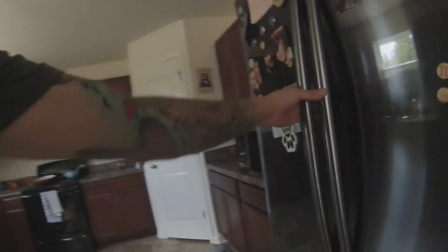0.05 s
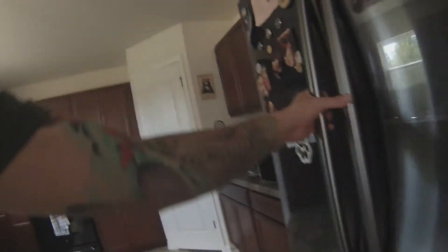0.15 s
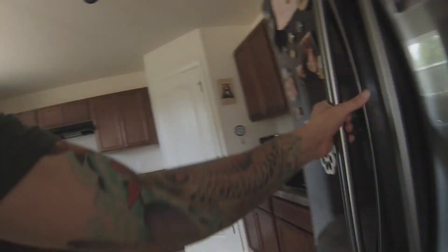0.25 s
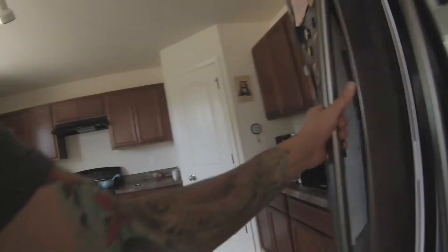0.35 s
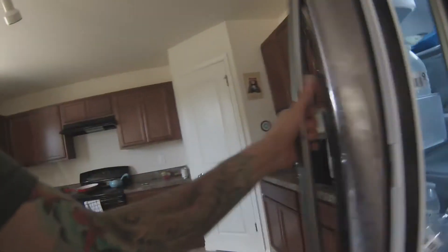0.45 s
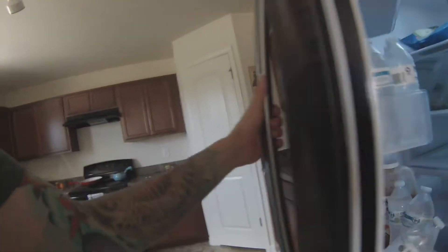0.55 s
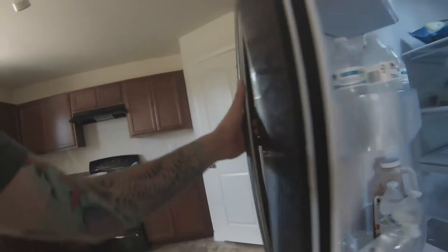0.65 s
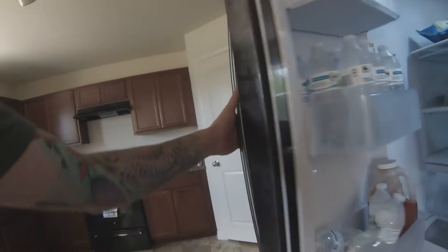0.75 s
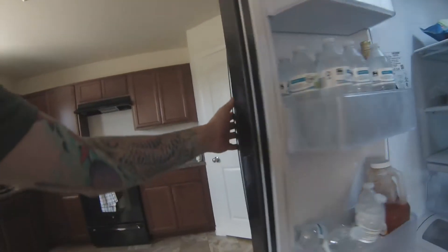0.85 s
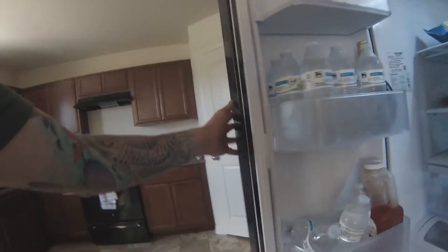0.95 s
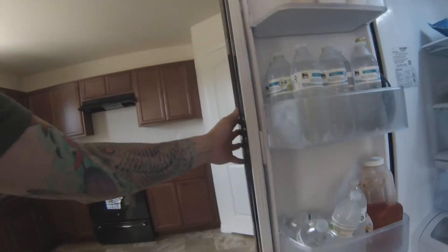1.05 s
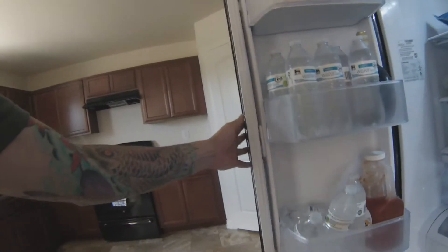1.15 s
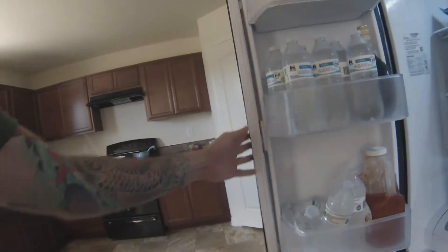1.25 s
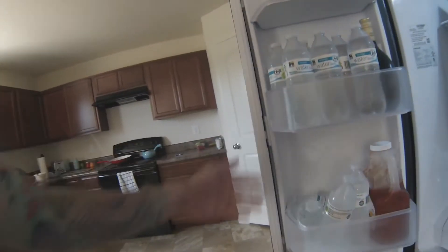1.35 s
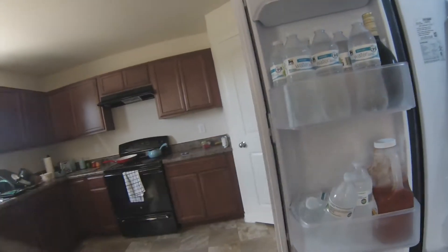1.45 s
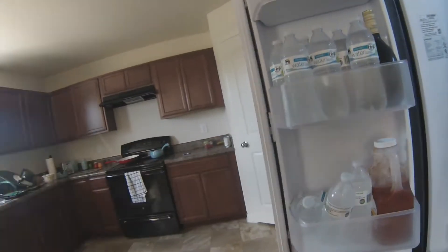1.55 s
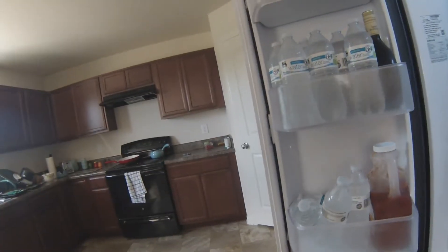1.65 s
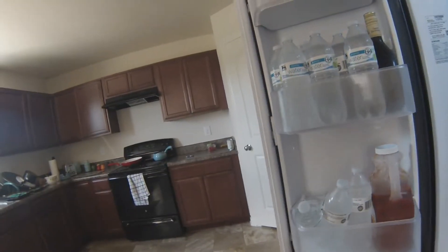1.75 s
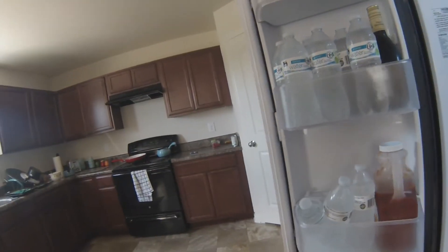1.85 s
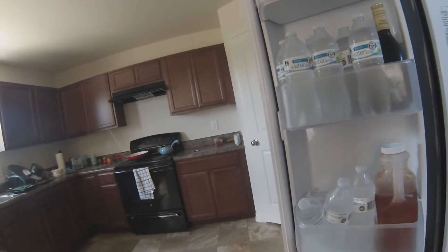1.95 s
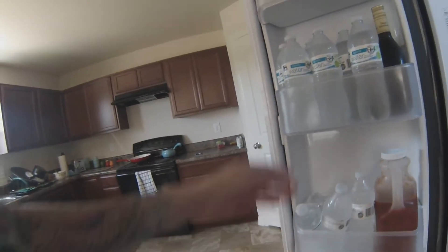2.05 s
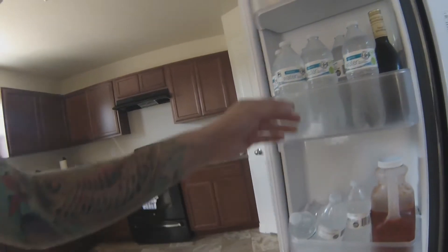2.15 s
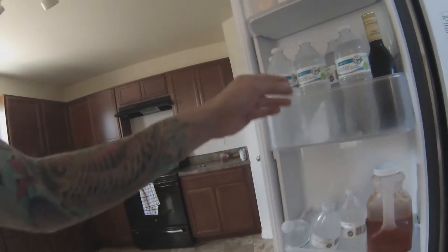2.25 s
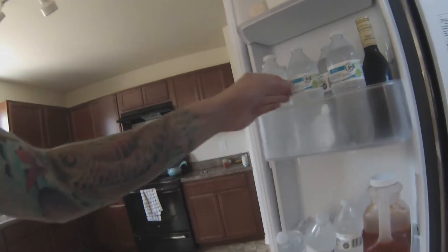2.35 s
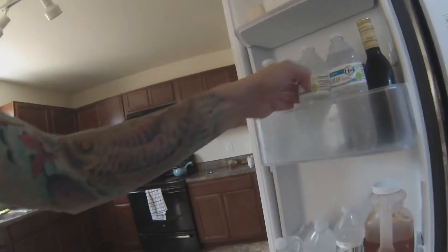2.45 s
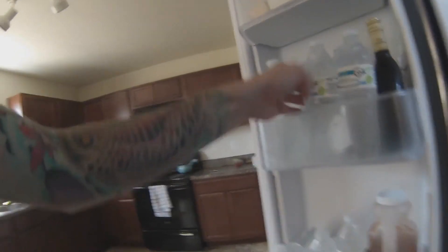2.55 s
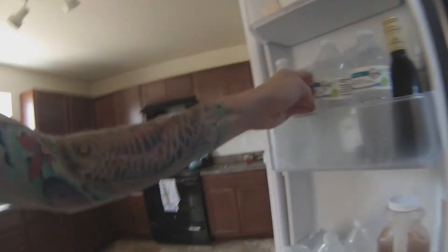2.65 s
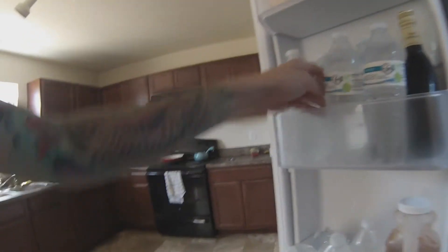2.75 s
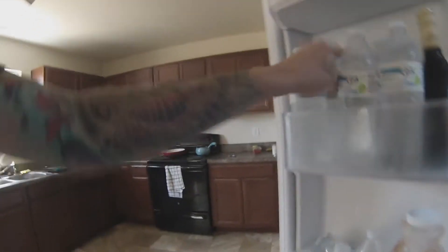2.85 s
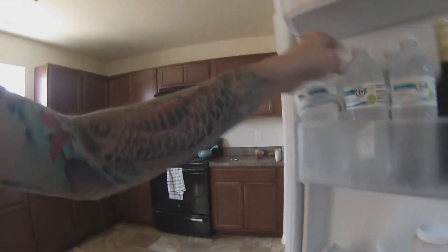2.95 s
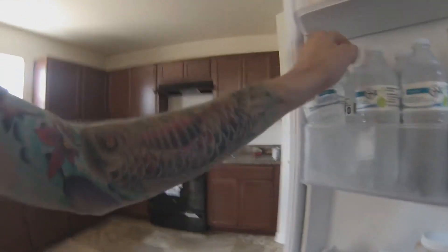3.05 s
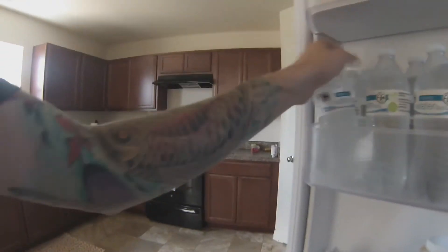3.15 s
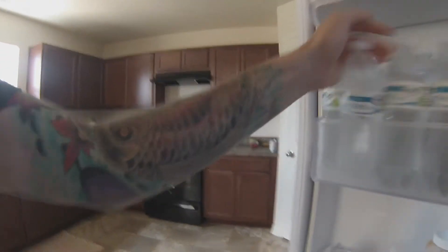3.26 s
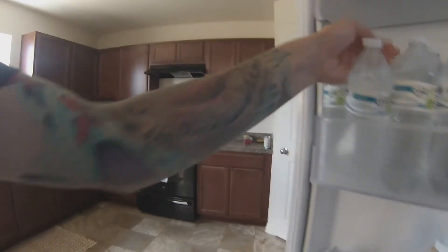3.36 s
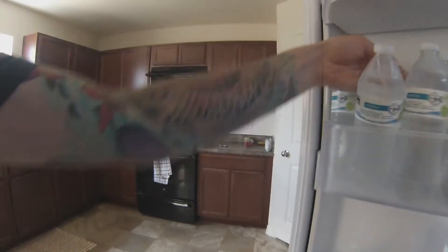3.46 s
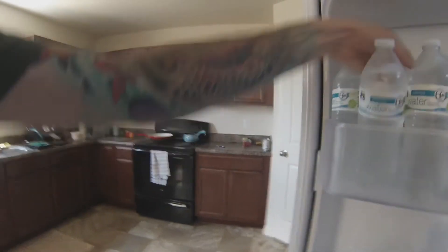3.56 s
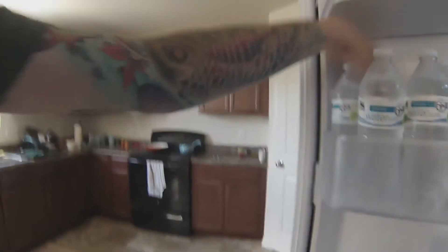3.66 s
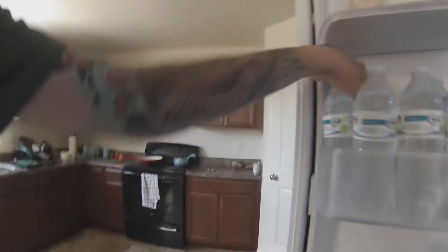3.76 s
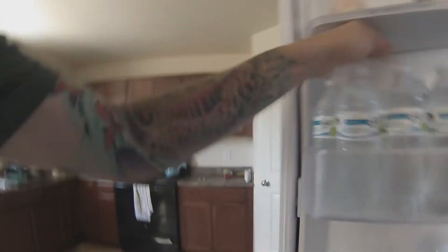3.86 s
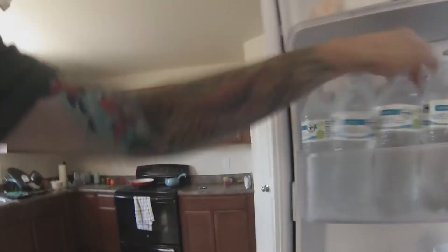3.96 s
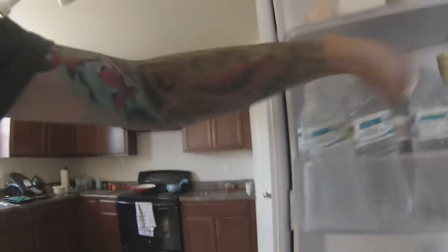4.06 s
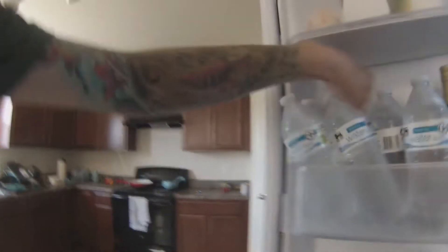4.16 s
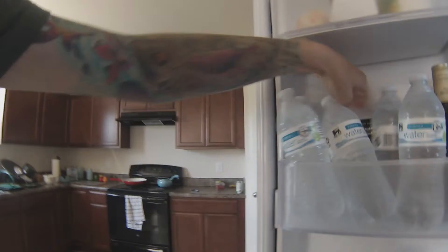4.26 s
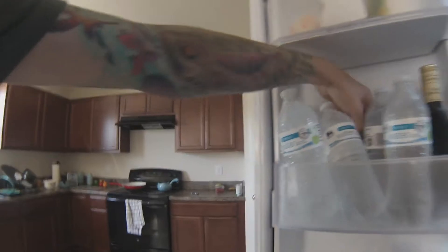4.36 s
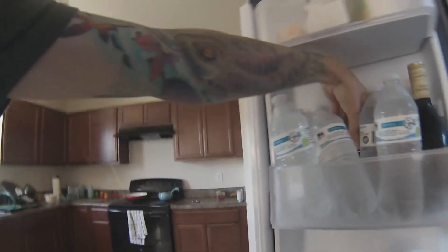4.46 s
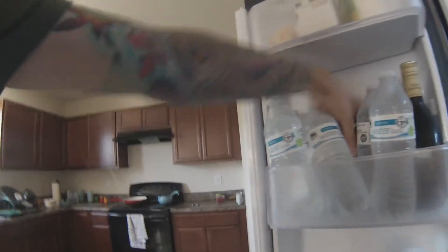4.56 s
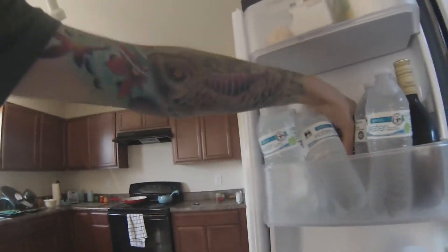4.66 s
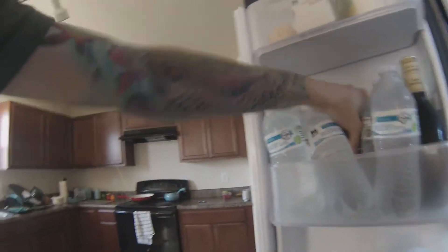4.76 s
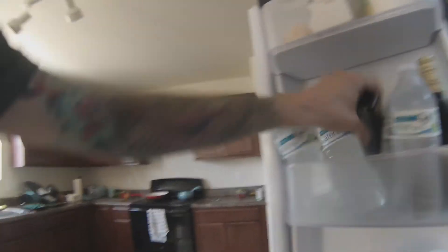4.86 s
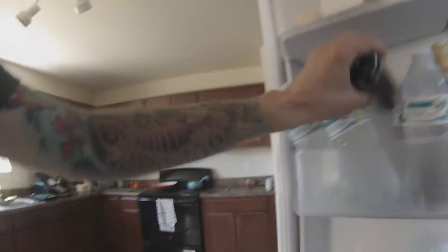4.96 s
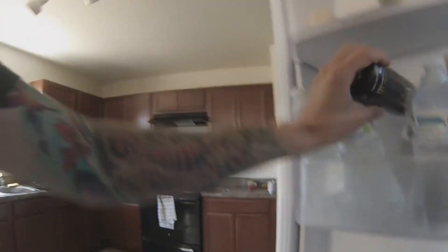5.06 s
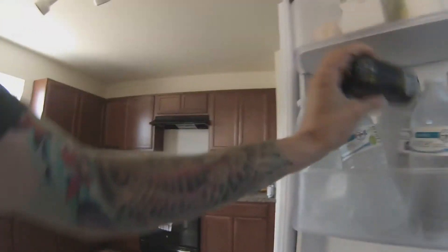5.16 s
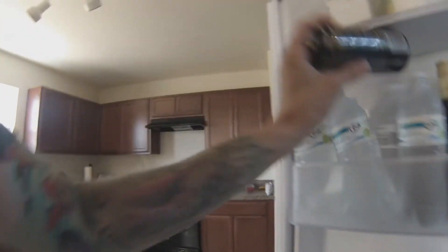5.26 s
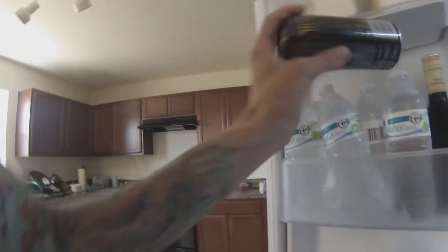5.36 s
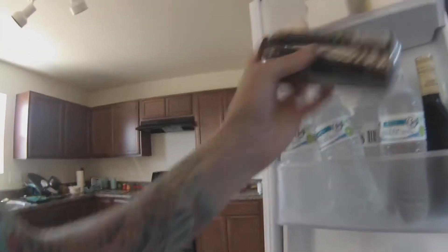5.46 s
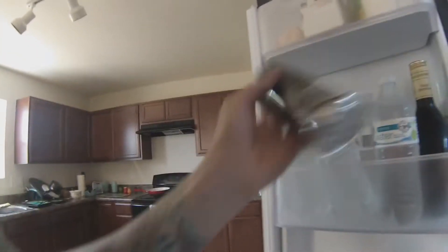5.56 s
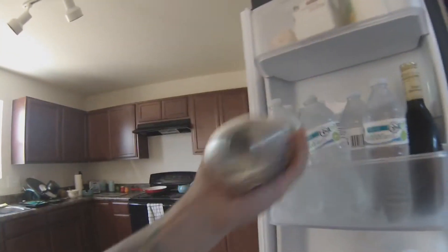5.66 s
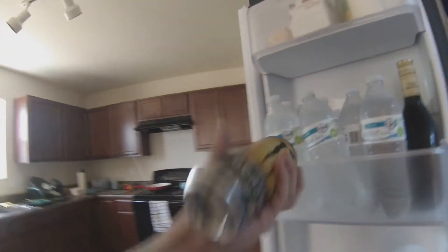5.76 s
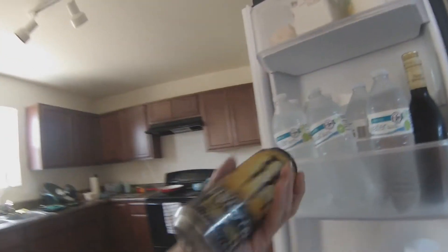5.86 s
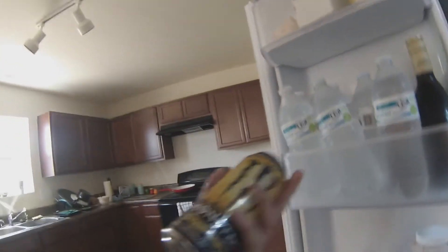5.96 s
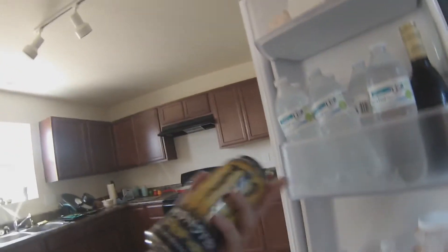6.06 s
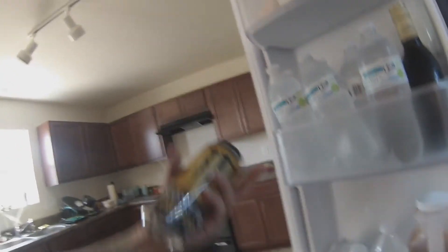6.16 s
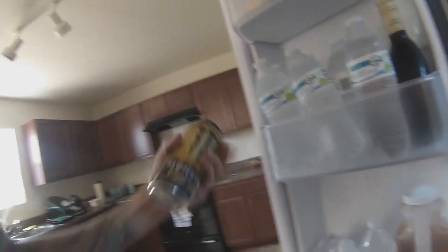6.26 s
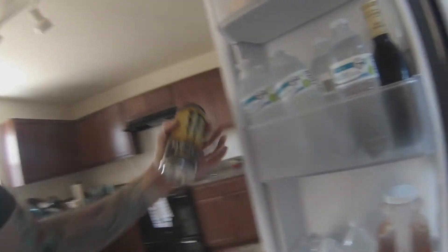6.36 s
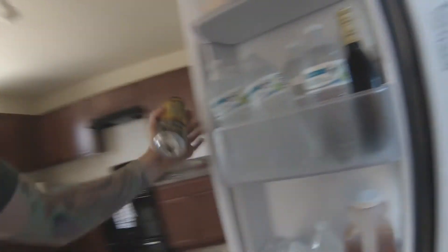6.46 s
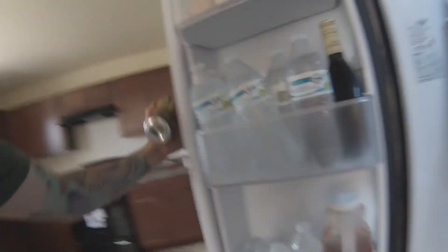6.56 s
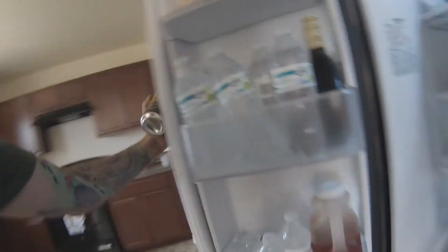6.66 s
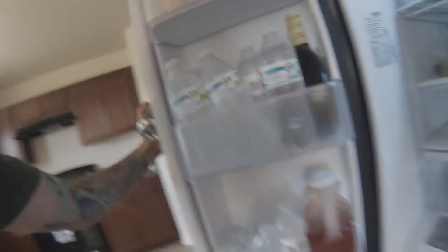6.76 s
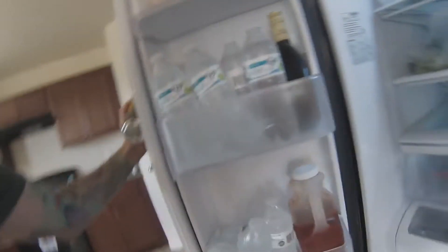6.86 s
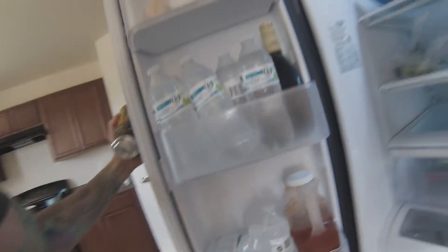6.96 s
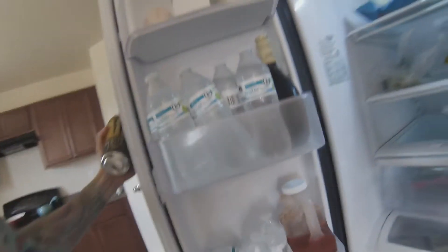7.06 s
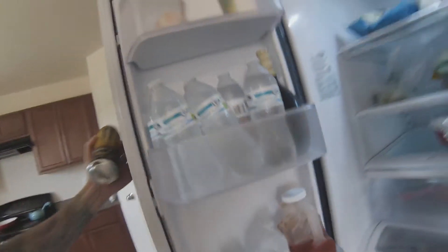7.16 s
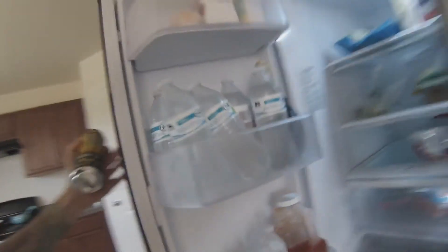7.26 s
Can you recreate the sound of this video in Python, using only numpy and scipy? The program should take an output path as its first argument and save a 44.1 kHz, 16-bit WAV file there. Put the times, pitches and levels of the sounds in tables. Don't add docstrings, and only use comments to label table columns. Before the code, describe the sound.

A fridge door opens softly, then a hand shoves thin plastic water bottles aside with clattering knocks and sharp crinkling snaps, over a low fan hum.

```python
import sys
import numpy as np
from scipy import signal
from scipy.fft import rfft, irfft
from scipy.io import wavfile
from scipy.ndimage import uniform_filter1d

SR = 44100
rng = np.random.default_rng(int(sys.argv[2]) if len(sys.argv) > 2 else 0)


def store_wav(level_fs):
    pcm = np.round(np.clip(np.atleast_2d(level_fs), -1, 1) * 32767)
    wavfile.write(sys.argv[1], SR, pcm.T.astype(np.int16))


def voltage_ratio(decibels):
    exponent = np.asarray(decibels, float) / 20
    return 10 ** exponent


N = 321644


def unit(x):
    return x / np.sqrt(np.mean(x ** 2))


def colour(x, points):
    hz, db = np.transpose(points)
    f = np.maximum(np.fft.rfftfreq(len(x), 1 / SR), 1)
    return irfft(rfft(x) * voltage_ratio(np.interp(np.log(f), np.log(hz), db)), len(x))


def band_limit(x, order, hz, kind):
    return signal.sosfilt(signal.butter(order, hz, kind, fs=SR, output="sos"), x)


def resonate(x, peaks):
    return sum(voltage_ratio(db) * signal.lfilter(*signal.iirpeak(hz, hz / width, fs=SR), x)
               for hz, width, db in peaks)


def level_curve(spans):
    t, level = np.arange(N) / SR, np.full(N, -110.0)
    for rows in map(np.array, spans):
        inside = (t >= rows[0, 0]) & (t <= rows[-1, 0])
        level[inside] = np.interp(t[inside], rows[:, 0], rows[:, 1])
    return uniform_filter1d(level, size=441)


def walk(rate):
    k = int(SR / rate)
    held = np.repeat(rng.standard_normal(N // k + 1), k)
    return unit(uniform_filter1d(held, k)[:N])


def grains(per_s, spread_db):
    clicks = (rng.random(N) < per_s / SR) * rng.standard_normal(N)
    return unit(clicks * voltage_ratio(spread_db * np.minimum(rng.exponential(size=N), 2)))


def ring(hz, db, t60, chatter, contact_ms, rise_ms):
    t = np.arange(int(SR * np.clip(np.max(t60), .005, .4))) / SR
    decay = np.exp(-np.log(1000) * np.outer(1 / t60, t))
    modes = voltage_ratio(db) @ (np.sin(2 * np.pi * np.outer(hz, t)) * decay)
    ms = np.arange(1, len(chatter) + 1) * 1000 / SR
    push = chatter * np.exp(-ms / max(contact_ms, .05)) * (1 - np.exp(-ms / max(rise_ms, .02)))
    out = signal.fftconvolve(modes, push)
    return out / np.abs(out).max()


def add(out, s, x):
    i = int(max(s, 0) * SR)
    out[i:i + len(x)] += x[:N - i]


def away_from(s, times):
    return np.min(np.abs(s - np.array(times))) * 200 > 1


# (frequency [Hz], level [dB per Hz])
KITCHEN_NOISE = [(20, -2.5), (54, -1), (103, -11), (230, -14.5), (398, -11), (507, -14), (1700, -18),
                 (16000, -41.5)]
# (time [s], level [dB])
FAN_TURNS = [(0, 3.5), (0.45, 2), (1.2, 1.5), (2.4, 1), (5.8, 0), (6.6, 0), (7.29, 2)]
# (frequency [Hz], level [dB])
MAINS_HUM = [(59.2, -84)]


def kitchen():
    t = np.arange(N) / SR
    air = unit(colour(rng.standard_normal(N), KITCHEN_NOISE))
    air = air * voltage_ratio(-56 + np.interp(t, *np.transpose(FAN_TURNS)) + 0.22 * walk(3.54))
    hum = sum(voltage_ratio(db + 1 + 3.3 * walk(8.2)) * np.sin(2 * np.pi * hz * t) for hz, db in MAINS_HUM)
    return air + hum


# (frequency [Hz], decay time t60 [s], level [dB])
KITCHEN_ECHO = [(102, 1, 1), (200, 0.34, 2.5), (450, 0.5, 1), (1220, 0.57, -2), (5500, 0.24, -1),
                (12900, 0.26, 1.5)]


def echo(x):
    echo_db, gap_s = -6.5, 0.014
    t, tail = np.arange(SR) / SR, 0
    hz, t60s, levels = np.transpose(KITCHEN_ECHO)
    for f in 45 * 2 ** np.arange(9):
        t60 = np.interp(np.log(f), np.log(hz), t60s)
        db = np.interp(np.log(f), np.log(hz), levels)
        octave = band_limit(rng.standard_normal(SR), 2, [f / 2 ** .5, f * 2 ** .5], "band")
        tail = tail + octave * voltage_ratio(db - 60 * t / t60) / np.sqrt(t60)
    tail = tail * np.clip(t / gap_s, 0, 1) ** 2
    return signal.fftconvolve(x, tail / np.sqrt(np.sum(tail ** 2)))[:N] * voltage_ratio(echo_db)


# (time [s], length [s], level [dB], frequency [Hz])
SQUEAKS = [
    (0.0, 0.14, -69, 10600),
    (0.267, 0.03, -70, 10600),
    (0.3, 0.071, -72, 9200),
    (7.01, 0.13, -68, 10800),
    (7.03, 0.1, -78, 6020),
]


def squeaks():
    out = np.zeros(N)
    for (s, length, db, hz), g in zip(SQUEAKS, rng.standard_normal((len(SQUEAKS), 9000))):
        k = min(int(length * SR), len(g))
        tone = unit(resonate(g, [(hz, 97, 0)]))[:k]
        add(out, s, voltage_ratio(db) * tone * np.hanning(k) ** .5)
    return out


# (time [s], peak [dB], frequency [Hz])
DOOR_THUDS = [(0.129, -39.5, 109), (0.29, -35, 43.1), (0.872, -30.5, 61), (0.994, -27.5, 61.4),
              (1.012, -33, 37.7), (1.141, -29.5, 74.5), (1.175, -28, 37), (2.619, -38, 67.3),
              (3.105, -22.5, 117), (3.136, -22, 82.4), (3.358, -26, 61.9), (3.5, -38, 70.4),
              (3.989, -23, 57.4), (4.049, -32, 61.9), (4.55, -33, 56.5), (5.027, -27, 54),
              (5.499, -35.5, 64), (6.783, -31, 57), (7.018, -38, 52)]


def thuds():
    out = np.zeros(N)
    for (s, db, hz), g in zip(DOOR_THUDS, rng.standard_normal((len(DOOR_THUDS), 900))):
        modes, mode_db = hz * np.array([1, .7, 1.9]), np.array([0, -7, -6])
        add(out, s, voltage_ratio(db) * ring(modes, mode_db, np.full(3, 0.11), 1 + 0.33 * g, 1.76, 2.7))
    return out


SUDDEN = [2.824, 3.195, 3.267, 3.329, 3.358, 3.564, 3.632, 3.767, 3.823, 3.948, 3.986, 4.092, 4.188, 4.537,
          4.606, 4.697, 4.764, 4.972, 5.280, 6.755]


def blows(events, body, t60, floor_hz):
    out, body = np.zeros(N), np.repeat(body, repeats=4, axis=0)
    k = len(body)
    for (s, db, hz, ms), g in zip(events, rng.standard_normal((len(events), 4000))):
        modes = np.append(hz, body[:, 0] + 0.622 * body[:, 1] * g[-k:])
        distance = np.abs(np.log2(body[:, 0] / hz))
        mode_db = np.append(2.5, body[:, 2] + 1.1 * g[-2 * k:-k] - 12.6 * distance)
        rise_ms = 0.12 * ms * away_from(s, SUDDEN)
        add(out, s, voltage_ratio(db) * ring(modes, mode_db, np.full(k + 1, t60), g, ms, rise_ms))
    return band_limit(out, 3, floor_hz, "high")


# (time [s], peak [dB], strongest ring [Hz], contact [ms])
BOTTLE_KNOCKS = [(0.027, -39, 200, 3.3), (0.14, -39, 174, 31), (0.265, -35.5, 157, 17),
                 (0.412, -36, 165, 16), (1.008, -39.5, 148, 74), (1.144, -37, 140, 18),
                 (1.348, -38.5, 182, 31), (1.708, -37, 152, 4.6), (2.195, -34, 224, 5.7),
                 (2.428, -42, 260, 8.7), (2.493, -17, 280, 21), (2.677, -43, 360, 6.3),
                 (2.828, -31.5, 200, 50), (2.904, -18, 222, 35), (3.105, -30, 147, 15),
                 (3.139, -30, 144, 7.3), (3.195, -27, 425, 14), (3.296, -19, 397, 45),
                 (3.333, -8.5, 206, 5.2), (3.505, -47, 199, 6.8), (3.565, -31.5, 404, 40),
                 (3.634, -22, 312, 43), (3.823, -24.5, 367, 270), (3.955, -17, 298, 11),
                 (3.972, -15, 222, 8), (3.987, -16, 386, 13.4)]
# (time [s], peak [dB], strongest ring [Hz], contact [ms])
CAN_KNOCKS = [(4.134, -12.5, 404, 8.1), (4.242, -14.5, 367, 10.2), (4.249, -13.5, 364, 8.3),
              (4.288, -36, 450, 9.2), (4.365, -19.5, 420, 7.3), (4.482, -28.5, 237, 24),
              (4.534, -24, 255, 6.5), (4.602, -24.5, 358, 20), (4.698, -26.5, 437, 7.2),
              (4.745, -31, 340, 25), (4.84, -30.5, 357, 31), (4.862, -26, 420, 16), (4.971, -33, 238, 30),
              (5.07, -25.5, 423, 5.5), (5.122, -32, 196, 11), (5.191, -25.5, 190, 8.7),
              (5.281, -21.5, 496, 17), (5.281, -17.5, 298, 26), (5.728, -40, 188, 17),
              (5.926, -43, 407, 4.9), (5.998, -47.5, 410, 9.2), (6.754, -22, 180, 14.3),
              (6.964, -42, 161, 15), (7.004, -29.5, 145, 8.5)]
# (frequency [Hz], width [Hz], level [dB])
SHELF = [(210.7, 37.5, -0.5), (280, 125, -2.5), (380.6, 44, 1), (516, 35, -50)]


def knocks():
    return blows(list(BOTTLE_KNOCKS) + list(CAN_KNOCKS), SHELF, t60=0.11, floor_hz=131)


# (frequency [Hz], width [Hz], level [dB])
CABINET = [(59, 2.5, 8), (95.5, 8.1, -3)]


def cabinet_boom(shelf_knocks):
    return voltage_ratio(0.5) * resonate(np.abs(shelf_knocks), CABINET)


# (time [s], peak [dB], strongest ring [Hz])
BOTTLE_RAPS = [(0.14, -40, 900), (0.157, -45, 760), (0.226, -30.5, 1270), (0.27, -42, 910),
               (0.31, -51, 990), (0.435, -49, 720), (2.497, -17.5, 1130), (2.619, -30, 780),
               (2.824, -34, 762), (2.86, -25, 720), (2.905, -19, 686), (2.935, -21.5, 804),
               (2.961, -24.5, 704), (3.001, -24, 790), (3.024, -23.5, 710), (3.196, -36, 820),
               (3.222, -29, 775), (3.272, -22, 770), (3.289, -22, 790), (3.322, -11, 700),
               (3.404, -43, 807), (3.449, -56, 820), (3.566, -24, 775), (3.593, -35, 716),
               (3.638, -20, 805), (3.683, -26.5, 750), (3.769, -21.5, 1220), (3.824, -25, 1190),
               (3.887, -20.5, 960), (3.955, -26, 634), (3.976, -19, 820), (3.987, -11.5, 1000)]
# (time [s], peak [dB], strongest ring [Hz])
CAN_RAPS = [(4.092, -22.5, 767), (4.135, -13.5, 895), (4.163, -19.5, 770), (4.213, -12, 930),
            (4.245, -18, 1245), (4.29, -16.5, 1130), (4.372, -22.5, 1280), (4.538, -22, 984),
            (4.606, -25, 800), (4.697, -29.5, 1220), (4.738, -29.5, 1040), (4.841, -28, 960),
            (4.86, -23, 880), (5.073, -24.5, 754), (5.253, -21.5, 990), (5.28, -11.5, 1096),
            (5.728, -36, 910), (6.755, -24, 840), (6.756, -22.5, 1560), (6.79, -35, 1430)]
# (frequency [Hz], width [Hz], level [dB])
BOTTLE_WALLS = [(721, 200, 6), (830, 157, 0.5), (1075, 183, -1.5), (1220, 34, -9.5), (1540, 408, -19)]


def raps():
    events = [(s, db, hz, 12.6 + 0.09 * db) for s, db, hz in list(BOTTLE_RAPS) + list(CAN_RAPS)]
    return blows(events, BOTTLE_WALLS, t60=0.067, floor_hz=787)


def rattle():
    rattle_db, t60 = -19, 0.15
    power, t = np.zeros(N), np.arange(SR // 2) / SR
    for s, db, _ in list(BOTTLE_RAPS) + list(CAN_RAPS):
        add(power, s, voltage_ratio(2 * (db + rattle_db - 60 * t / t60)))
    return np.sqrt(power)


# (time [s], level [dB])
SLIDE_EFFORT = [
    [(0.0, -62), (0.12, -59.5), (0.268, -48), (0.45, -58), (0.7, -70)],
    [(1.25, -60.5), (1.368, -51), (1.5, -86)],
    [(2.41, -44), (2.79, -54.5), (3.18, -53), (3.33, -27.5), (3.52, -55.5), (4.15, -36.5), (4.65, -54.5),
     (5.33, -45), (5.8, -64.5)],
]


def slide():
    effort_db = curve_db = level_curve(SLIDE_EFFORT)
    slip = grains(900, 1.0) * voltage_ratio(2 * walk(25.06))
    shelf = unit(resonate(slip, SHELF)) * voltage_ratio(effort_db - 1.0)
    walls = unit(resonate(slip, BOTTLE_WALLS)) * (voltage_ratio(curve_db - 8.5) + rattle())
    return shelf + walls


# (time [s], length [s], level [dB], fade [dB])
GRIPS = [(0.0, 0.17, -58, 29), (1.297, 0.12, -59.5, 4), (2.459, 0.25, -45.5, 18), (2.821, 0.31, -55, 0),
         (3.189, 0.44, -44.5, 16), (3.583, 1, -50, 1), (4.495, 0.29, -56, 12), (4.753, 0.39, -52, -1),
         (5.14, 0.16, -79, 11), (6.742, 0.29, -54.5, 21), (0.24, 0.12, -68, 10), (4.97, 0.2, -43, 14),
         (5.245, .2, -58, 23), (4.2, .25, -49, 14)]
# (frequency [Hz], level [dB])
FILM_TONE = [(900, -31), (1500, 3), (2000, -7), (3200, 7), (5000, 2.5), (8000, -10), (13000, -9.5),
             (15500, -28)]


def film():
    burst = np.exp(-np.arange(900) / 99.0)
    flash = signal.fftconvolve(np.abs(grains(600, 7.5)) * voltage_ratio(2 * walk(36)), burst)[:N]
    rub = (unit(flash) + 0.26) * rng.standard_normal(N)
    spans = [[(s, db), (s + length, db - fade)] for s, length, db, fade in GRIPS]
    return unit(colour(rub, FILM_TONE)) * voltage_ratio(level_curve(spans))


# (time [s], peak [dB], strongest ring [Hz], top 6-14 kHz relative level [dB])
TICKS = [(0.0294, -54, 1840, 2), (0.153, -50, 1870, -20), (0.2434, -29.5, 2670, -19),
         (0.7536, -50.5, 2460, 11), (1.3338, -32, 1720, -30), (1.385, -46, 1880, -7),
         (1.6966, -34, 1760, -7), (2.724, -40, 2410, 1), (2.9674, -32, 1960, 5.5), (4.555, -50, 2260, 10),
         (5.7255, -33, 1870, -13), (5.8915, -43.5, 1900, -5), (6.731, -39, 2400, -4),
         (6.7548, -20, 1670, -20), (6.8087, -33.5, 2010, -21), (7.028, -45, 1860, 6.5),
         (7.165, -58, 4000, 2), (7.1823, -51.5, 4480, 12)]
BOTTLE_CRACKS = [(2.4577, -30.5, 4200, 0), (2.498, -22, 1830, -17), (2.5615, -28.5, 1760, -6.5),
                 (2.6128, -32, 1990, -30), (2.8238, -26, 1910, -30), (2.883, -28, 3770, 0),
                 (2.9032, -16.5, 2840, -6), (3.0254, -32, 1830, -23), (3.1049, -33.5, 3980, -15),
                 (3.194, -27.5, 5860, 3.5), (3.223, -48, 1770, -15), (3.268, -18.5, 1900, 0),
                 (3.2996, -12.5, 2940, -29), (3.3287, -9.5, 2900, -32), (3.3578, -23, 1950, 2),
                 (3.4446, -32, 2470, -15), (3.5638, -27, 2030, -5.5), (3.621, -36, 2860, -12),
                 (3.637, -22.5, 2280, 3.5), (3.665, -27, 2190, -27), (3.7025, -27, 1800, -23),
                 (3.7533, -52, 2000, -15), (3.7669, -14.5, 2350, -3.5), (3.7975, -34, 2350, -4),
                 (3.8226, -28.5, 1970, 1.5), (3.867, -25.5, 3120, -12), (3.8904, -47, 2870, -25),
                 (3.9483, -19.5, 1910, -3.5), (3.9858, -7.5, 3600, -19)]
CAN_CRACKS = [(4.1194, -36, 1880, -28), (4.1304, -18, 1790, -32), (4.154, -18, 3050, -17),
              (4.1883, -10.5, 1770, -7), (4.2125, -8.5, 2960, -17), (4.2444, -20, 1820, -1),
              (4.282, -20.5, 2870, -6), (4.309, -21.5, 1770, -5), (4.335, -43, 1880, -22),
              (4.3542, -30, 1800, -13), (4.3704, -18, 2415, -11), (4.483, -40, 2040, -10),
              (4.537, -30.5, 2850, -24), (4.6071, -31.5, 2850, -17), (4.627, -31.5, 2970, -7),
              (4.697, -30.5, 2870, -26), (4.7365, -37, 2080, -9), (4.764, -40.5, 2860, 10.5),
              (4.819, -34.5, 1720, 1.5), (4.8714, -39, 1790, 4), (4.8864, -25.5, 3160, -5),
              (4.953, -42, 4240, -11), (4.9724, -11, 4740, 1), (5.0081, -23, 2470, 2),
              (5.0724, -26, 5450, -24), (5.1475, -29.5, 3120, -3), (5.1815, -27.5, 3150, -12),
              (5.2483, -18, 1750, -6.5), (5.28, -15, 2240, -25), (5.446, -34.5, 1960, -33)]
CRINKLES = [(0.1156, -47, 2530, -14), (3.1477, -41, 1790, -5), (3.2355, -42, 1780, -12),
            (3.4074, -34, 2900, -14), (3.5119, -39, 4200, -8), (3.5235, -41, 3000, -1),
            (3.6314, -26.5, 5500, 6), (3.6774, -31.5, 5000, 1.5), (3.8324, -24.5, 5440, -5),
            (3.8614, -40.5, 5000, 9), (3.9094, -44, 2260, -9), (3.9214, -37, 3500, -14),
            (3.9644, -27, 1880, -3), (4.0344, -26, 4500, -1), (4.0644, -27, 4000, -12),
            (4.2084, -18, 3000, -5), (4.2574, -28, 1940, -8), (4.2924, -20, 2980, -12),
            (4.5082, -31.5, 2040, -16), (4.6444, -37, 2980, -5), (4.7844, -39, 3890, 3),
            (4.8394, -40, 4000, 2), (4.9094, -42, 5000, 10), (4.9294, -38, 4200, 0),
            (5.2144, -33, 3000, -2), (5.5094, -52, 2760, -8), (7.16, -55, 5500, 10), (7.1884, -59, 4400, 8)]
TEARS = [
    2.5615,
    2.883,
    3.268,
    3.948,
    4.819,
    5.008,
]


def cracks():
    out = np.zeros(N)
    events = list(TICKS) + list(BOTTLE_CRACKS) + list(CAN_CRACKS) + list(CRINKLES)
    places, draws = rng.random((len(events), 100)), rng.standard_normal((len(events), 2400))
    for (s, db, hz, top_db), u, g in zip(events, places, draws):
        chatter = g * np.abs(g)
        soft = away_from(s, SUDDEN)
        ms = 7.5 if away_from(s, TEARS) else 36
        mid = np.append(hz, 1750 * 3.45 ** ((np.arange(39) + u[:39]) / 39))
        mid_db = np.append(3.0, 1.8 * g[-39:] - 6.5 * np.abs(np.log2(mid[1:] / hz)))
        body = ring(mid, mid_db, np.full(40, .018), chatter, ms, 0.14 * soft * ms)
        add(out, s, voltage_ratio(db) * body)
        top = 6000 + 8800 * (np.arange(60) + u[40:]) / 60
        tilt_db = 1.9 * g[-99:-39] - 11.4 * np.log2(top / 6000)
        hiss = ring(top, tilt_db, np.full(60, .012), chatter, 0.41 * ms, 0.63 * soft * ms)
        add(out, s, voltage_ratio(db + top_db) * hiss)
    return out


def scene():
    shelf_knocks = knocks()
    near = cracks() + shelf_knocks + raps() + slide() + film() + squeaks()
    scattered = near * np.tanh(2 * walk(260))
    mono = near + echo(scattered) + cabinet_boom(shelf_knocks) + thuds() + kitchen()
    return np.tile(mono, (2, 1))


def drop_quiet_top(x):
    f, _, z = signal.stft(x, SR, nperseg=1024)
    power = uniform_filter1d(uniform_filter1d(np.abs(z) ** 2, size=12, axis=0), size=2, axis=1)
    keep = (f[:, None] < 12800) | (power > voltage_ratio(2 * -97.5))
    return signal.istft(z * np.where(keep, 1, voltage_ratio(-32)), SR, nperseg=1024)[1][:N]


def roll_off(x):
    return signal.sosfilt(signal.butter(12, 16500, fs=SR, output="sos"), x)


# (frequency [Hz], level [dB])
HOUSING = [(1250, 1), (1550, -3.5), (1850, -0.5)]


def record(dry):
    mono = band_limit(colour(dry[0], HOUSING), 2, 35, "high")
    mono = signal.sosfilt(signal.ellip(8, .2, 60, 15150, fs=SR, output="sos"), mono)
    mono = drop_quiet_top(mono)
    mismatch = [(100, -37), (300, -30), (550, -36), (4000, -31), (9000, -25.5)]
    trace = colour(mono, mismatch) * walk(60)
    return roll_off(mono + trace * np.array([[1], [-1]]))


dry = scene()
out = record(dry)
store_wav(out)
```